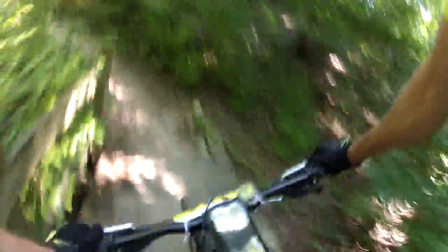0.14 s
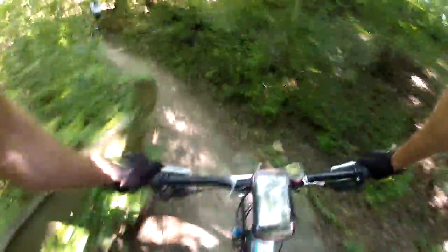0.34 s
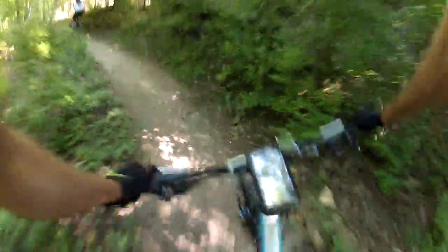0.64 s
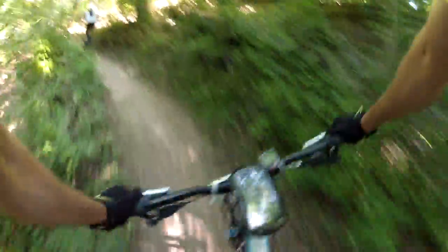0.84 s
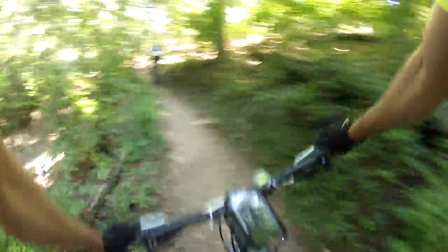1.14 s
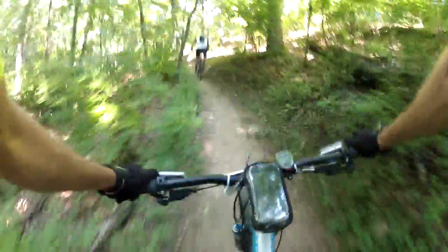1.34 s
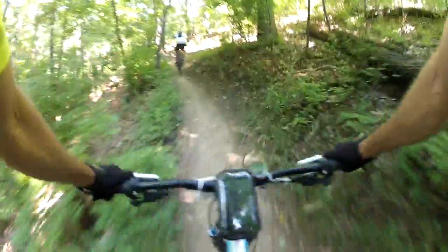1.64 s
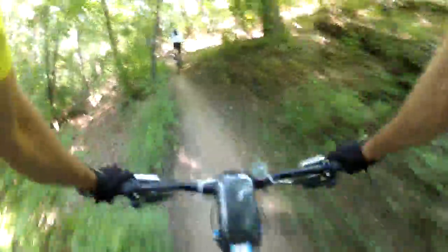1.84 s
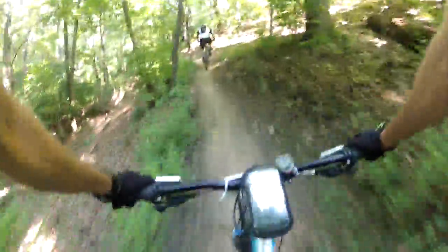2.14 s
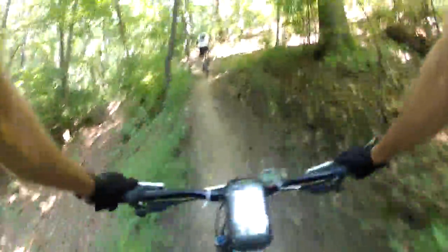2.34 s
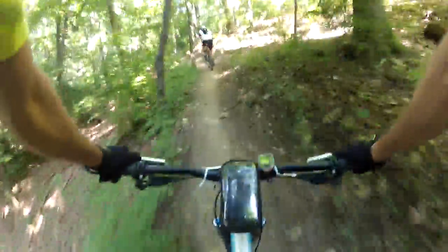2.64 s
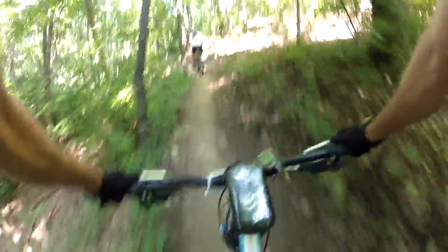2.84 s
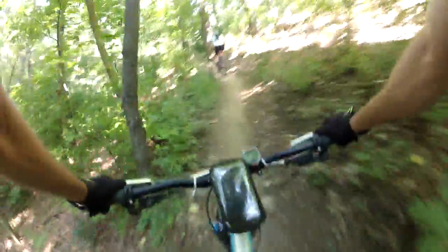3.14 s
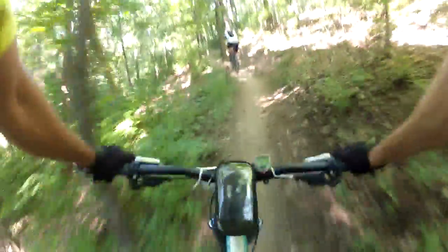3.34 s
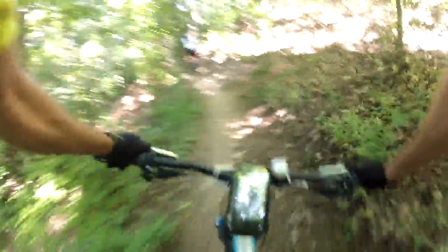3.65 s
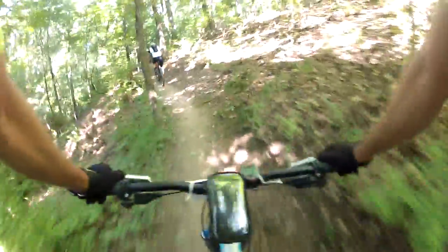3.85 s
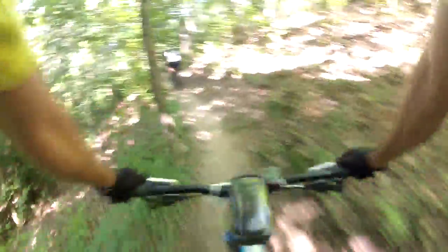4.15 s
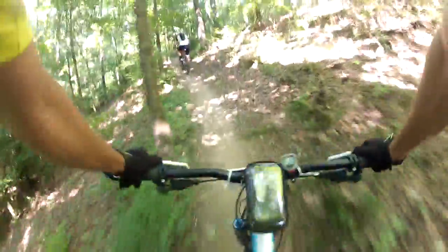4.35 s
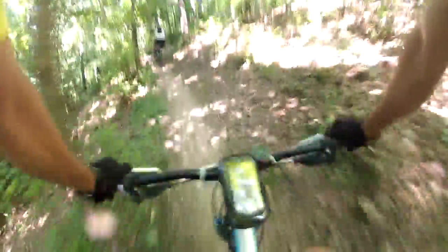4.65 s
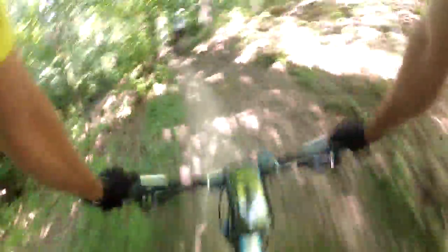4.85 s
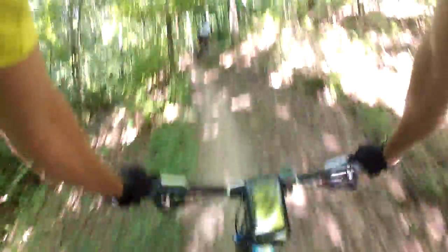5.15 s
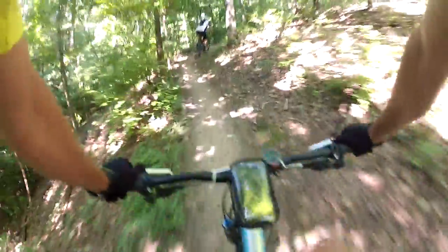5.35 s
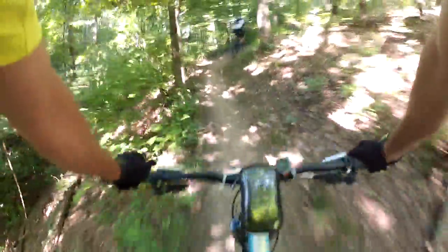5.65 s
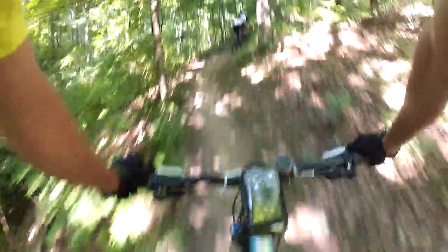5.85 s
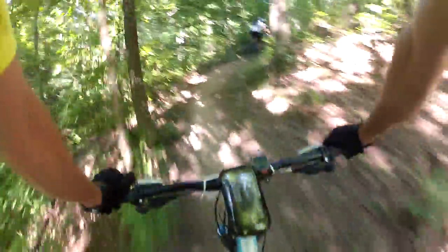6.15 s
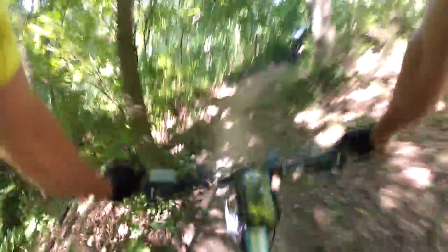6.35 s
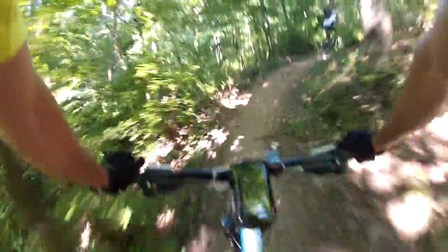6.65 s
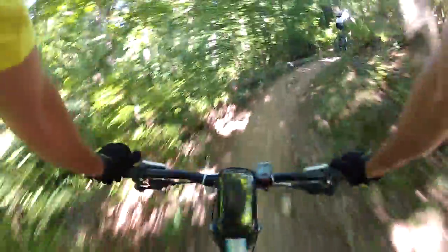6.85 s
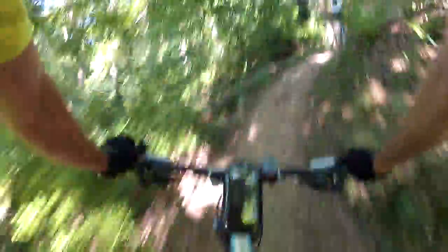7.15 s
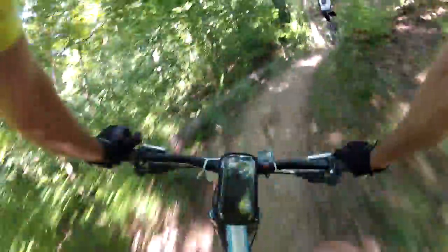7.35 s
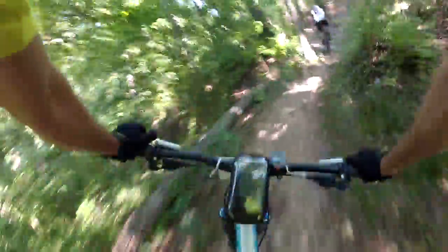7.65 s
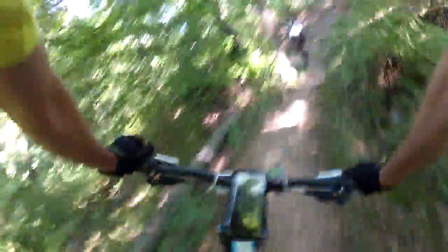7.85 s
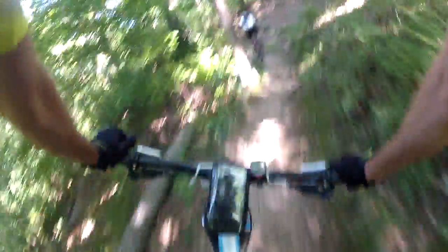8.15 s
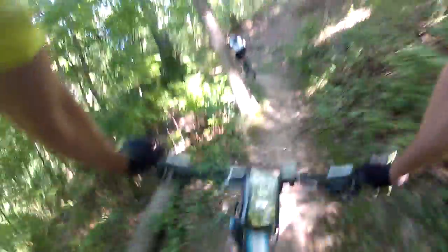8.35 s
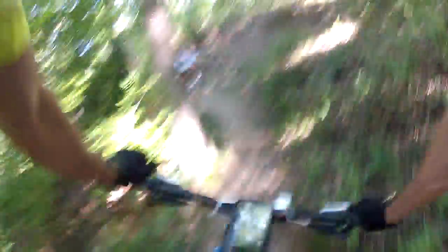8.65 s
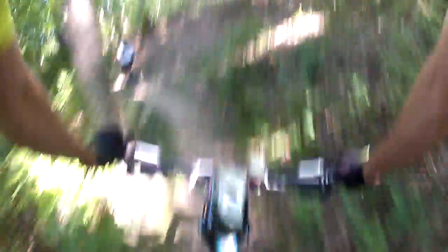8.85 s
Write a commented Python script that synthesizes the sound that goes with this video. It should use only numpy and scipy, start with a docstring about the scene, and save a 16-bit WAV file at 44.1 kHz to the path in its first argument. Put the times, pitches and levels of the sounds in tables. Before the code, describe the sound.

Heard from inside a closed plastic housing on the rider's chest, tyres rumble, strap rubs, plastic knocks and bumps thud, and a faint tone sounds.

```python
"""Low jolts and hard plastic knocks come first, over tyre rumble and a dry rubbing: a bumpy dirt trail by bike.
The microphone sits in a camera in a closed plastic housing, strapped to the rider's chest. Little comes
through the air: rumble and jolts (noise, short swings) arrive through the body; strap and knocks ring the
housing modes. A thin tone sounds three times. The sound chip samples slowly and mirrors all this in the treble."""
import sys
import numpy as np
from scipy import signal
from scipy.fft import rfft, irfft
from scipy.io import wavfile

SR = 44100
rng = np.random.default_rng(int(sys.argv[2]) if len(sys.argv) > 2 else 0)


def materialize(psi):
    """Save the field psi as 16-bit PCM at rate SR to the path in sys.argv[1].

    A 1-D psi becomes a single channel; in a 2-D psi each row is a channel.
    """
    bounded = np.clip(np.atleast_2d(psi).T, -1, 1)
    quanta = np.round(bounded * 32767).astype(np.int16)
    wavfile.write(sys.argv[1], SR, quanta)


N = 397341

# Low jolts from roots and stones, felt through the chest.
# Each row: peak time in seconds, envelope peak in dB before gain control, pitch in Hz.
JOLT_EVENTS = [(0.06, -22, 114), (0.178, -23.5, 112), (0.2402, -26, 156), (0.351, -7.5, 122),
               (0.655, -38, 136), (0.822, -35.5, 100), (0.898, -32.5, 92), (1.108, -26, 117),
               (1.152, -25, 130), (1.2554, -6, 158), (1.36, -14.5, 131), (2.067, -34.5, 111),
               (2.205, -35, 95), (2.489, -28.5, 86), (2.599, -33, 118), (3.218, -36, 99), (3.311, -32, 140),
               (3.444, -24.5, 101), (3.861, -30, 91), (4.332, -24, 90.6), (4.589, -29.5, 101),
               (4.776, -30.5, 99.5), (4.855, -27, 86), (4.933, -25, 145), (4.977, -29, 162),
               (5.044, -13, 168), (6.527, -36, 147), (6.645, -32, 103), (6.755, -39, 100),
               (6.84, -28.5, 136), (7.301, -31, 114), (7.59, -33, 102), (7.94, -29, 99), (8.003, -35, 106),
               (8.15, -37, 110), (8.336, -27.5, 142), (8.541, -31, 112), (8.675, -29, 141),
               (8.777, -29, 132), (8.9, -26.5, 154), (8.96, -32.5, 151)]
# The camera knocking in its housing, right at the microphone.
# Each row: start in seconds, peak in dB before gain control, extra level of the dull modes in dB,
# extra level of the bright modes in dB.
KNOCK_EVENTS = [(0.0218, -28.5, -1, 0), (0.0854, -31, -13, -12), (0.1138, -27, -14, -5),
                (0.2188, -14, -1, -9), (0.2355, 17, 12, -10), (0.3392, -26, 8, -9), (0.3545, -13, -2, 2),
                (0.5651, -31.5, -5, -15), (0.777, -29.5, -2, -3), (1.1074, -21.5, -1.5, -5.5),
                (1.2505, 16, -2, -28), (1.278, -27, -9, -25), (1.654, -41, -14, -20),
                (1.8244, -27.5, -7, -6), (2.068, -33.5, 0, -5), (2.2046, -23, -1, -4), (2.212, -21, -7, -6),
                (2.2207, -15.5, -11, 2), (2.257, -33, -1, -8), (2.272, -30, -2, -21),
                (3.259, -32, -9, -16.5), (3.436, -36, 16, -20), (4.1956, -32, 1, -24),
                (4.8414, -30.5, 5, -12), (4.896, -30.5, 18, -9), (4.9442, -24, -12, -8),
                (5.0411, -8.5, -13, -44), (7.1252, -21, -12, -15), (7.253, -35, 6, -11.5),
                (8.5242, -19.5, -7, -2.5), (8.668, -24, -13, -8), (8.735, -29, -8, -7),
                (8.896, -18, 2, 0.5)]
# Resonances of the plastic housing around the microphone.
# Each row: pitch in Hz, width in Hz before any contact damping, relative level in dB when rubbed,
# relative level in dB when knocked.
HOUSING_MODES = [(330, 94, -11, -7.5), (490.6, 87, -5, 7.5), (653, 190, -7.5, -7), (938, 277, -5, 17),
                 (1120, 196, -1, 1), (1363, 340, -8.5, 16.5), (1795, 191, -5, 15), (2038, 200, -4, 14),
                 (2340, 444, -10.5, -59), (2880, 360, -7.5, 14), (3415, 294, -8.5, -12.5),
                 (4166, 65, -8, 3.5), (4290, 570, -14, -26), (5400, 860, -26, -39.5), (1395, 26, -21.5, 12)]
# The strap sliding on the housing at the bigger shakes; the swells at 0.258 s and 1.264 s are instead a brief
# rattle right after the two hardest knocks. Each row: swell peak in seconds, nominal length in ms, rubbing in
# dB, bright scratch in dB before its flicker.
STRAP_SLIDES = [(0.041, 15, -38.5, -48), (0.258, 18.4, -20, -57), (0.355, 37, -29.5, -35),
                (0.683, 32, -42, -47), (0.79, 38, -42.5, -48), (0.878, 18, -43.5, -58),
                (0.971, 71, -44.5, -72), (1.112, 28, -38, -44), (1.192, 69, -44.5, -56),
                (1.264, 25, -36, -58), (1.353, 52, -37, -47), (1.562, 41, -49.5, -52.5),
                (1.744, 30, -56, -56), (1.817, 75, -51, -56.5), (1.975, 62, -51, -68),
                (2.218, 22, -43, -40), (2.272, 22, -41, -49), (2.389, 32, -53, -49.5),
                (2.509, 44, -38, -55), (2.596, 36, -44, -64), (2.764, 76, -49.5, -55.5),
                (2.883, 87, -51, -58), (2.98, 50, -67, -57.5), (3.03, 25, -45.5, -64),
                (3.128, 48, -45.5, -61.5), (3.29, 96, -47.5, -52.5), (3.403, 60, -47.5, -75),
                (3.625, 78, -45.5, -47.5), (3.709, 54, -46, -63), (3.817, 127, -51, -55.5),
                (3.954, 55, -51.5, -61), (4.217, 113, -46, -55.5), (4.359, 34, -60, -49.5),
                (4.519, 50, -47, -48.5), (4.658, 32, -44.5, -56.5), (4.77, 46, -40.5, -43),
                (4.942, 26.5, -38.5, -38.5), (5.05, 39, -35.5, -54), (5.179, 76, -40, -42.5),
                (5.289, 73, -51.5, -59.5), (5.533, 130, -53, -67), (5.911, 360, -54.5, -61.5),
                (6.199, 98, -54.5, -57), (6.352, 57, -58, -55), (6.411, 41, -49, -55),
                (6.539, 63, -45, -45), (6.643, 93, -50, -57), (6.868, 89, -49, -57),
                (7.03, 130, -54.5, -59), (7.171, 67, -47, -50), (7.256, 45, -46.5, -60),
                (7.32, 48, -41, -52.5), (7.432, 19, -58, -50), (7.612, 230, -58, -57),
                (7.734, 43, -47, -50), (7.918, 106, -45.5, -53), (8.132, 62, -49, -57),
                (8.322, 43, -42, -44), (8.405, 120, -47, -56.5), (8.536, 30, -36.5, -42),
                (8.673, 38, -36, -39.5), (8.737, 34, -45, -43.5), (8.896, 14, -41, -44),
                (8.961, 28, -41.5, -45.5)]
# How rough the trail is, as felt at the chest.
# Each row: time in seconds, rumble level in dB, steady strap drag in dB.
TRAIL_ROUGHNESS = [(0.0, -43, -49.5), (0.12, -41.5, -46.5), (0.65, -45, -50), (1.18, -42.5, -51),
                   (1.53, -48, -53.5), (1.88, -48.5, -55.5), (2.33, -43, -49), (2.63, -47.5, -53),
                   (3.71, -46.5, -55.5), (3.89, -51.5, -59.5), (4.12, -49.5, -54), (4.29, -41, -50.5),
                   (4.64, -47, -51), (4.92, -39.5, -46.5), (5.07, -45, -52.5), (5.4, -47.5, -56),
                   (6.35, -50.5, -56.5), (6.67, -47, -56), (7.33, -48, -53.5), (9.01, -40.5, -49)]
# Colour of the tyre rumble after its way through frame and body.
# Each row: frequency in Hz, relative spectrum level in dB.
RUMBLE_COLOUR = [(8.8, -21.5), (15, 6), (23, -2), (43, -6.5), (122, -4.5), (193, -10), (255, -17),
                 (322, -23.5), (500, -32), (650, -46), (1100, -120)]
# A thin steady tone. Each row: start in seconds, start of the fade in seconds, rms level in dB.
TONE_SPANS = [(0.0, 0.011, -46.5), (0.232, 0.318, -46.5), (1.254, 1.337, -44)]

JOLT_RISE_CYCLES, JOLT_FALL_CYCLES = 0.28, 0.98   # to 1/e of the envelope peak
DULL_TOP_HZ, BRIGHT_FROM_HZ = 1600, 2600
BUZZ_HZ = 1990   # the wall slaps back at the camera this often while they touch
CONTACT_MS = 2.8   # how long camera and wall touch
PRESS_MS = 1.35   # contact pressure builds at 1 per this time, from 0.36 up to 1
SCRATCH_DB = -11   # the bright part of the steady drag, relative to its rubbing
MODE_FLICKER_DB, MODE_FLICKER_HZ = 1.6, 14.3   # the drag favours now one mode, now another
TONE_HZ, TONE_FADE_S = 700, 0.041
SAMPLING_HZ = 12000
STOPBAND_HZ = 16328   # the output is 80 dB down from here


def from_db(db):
    """Decibels to gain."""
    return 10 ** (np.asarray(db) / 20)


def rms_one(x):
    """Scale to rms 1."""
    return x / np.sqrt(np.mean(x ** 2) + 1e-20)


def drift(corner_hz):
    """Slow chance of spread 1: noise through a double one-pole low-pass."""
    r = np.exp(-2 * np.pi * corner_hz / SR)
    noise = rng.standard_normal(N + SR)
    settled = signal.lfilter([1], [1, -2 * r, r * r], noise)[SR:]
    return rms_one(settled)


def resonance(x, hz, width_hz):
    """Two-pole band-pass, gain 1 on top."""
    r = np.exp(-np.pi * width_hz / SR)
    zeros = (1 - r * r) / 2 * np.array([1, 0, -1])
    poles = [1, -2 * r * np.cos(2 * np.pi * hz / SR), r * r]
    return signal.lfilter(zeros, poles, x)


def add(out, start_s, sound):
    """Mix a short sound in at start_s seconds, cut off at the ends of the scene."""
    i = round(start_s * SR)
    out[max(i, 0):i + len(sound)] += sound[max(-i, 0):N - i]


def jolts():
    """Each jolt is a cycle or two of the chest and mount swinging: a quick rise, a slower fall."""
    out = np.zeros(N)
    t = np.arange(-SR // 40, SR // 10) / SR
    cycles = np.where(t < 0, JOLT_RISE_CYCLES, JOLT_FALL_CYCLES)
    phases = rng.uniform(0, 2 * np.pi, (len(JOLT_EVENTS), 1))
    for (peak_s, peak_db, hz), phase in zip(JOLT_EVENTS, phases):
        envelope = np.exp(-(hz * t / cycles) ** 2)
        swing = np.sin(2 * np.pi * hz * t + phase)
        add(out, peak_s + t[0], from_db(peak_db) * envelope * swing)
    return out


def knocks():
    """A knock is a brief buzz of contacts and a faint after-rattle; it strikes every mode with its own strength."""
    out = np.zeros(N)
    t = np.arange(SR // 16) / SR
    ms = 1000 * t
    touching = np.clip(np.minimum(CONTACT_MS - ms, 0.36 + ms / PRESS_MS), 0, 1)
    slap_times = np.diff(np.floor(BUZZ_HZ * t), prepend=-1)
    soften = signal.butter(4, BRIGHT_FROM_HZ, fs=SR, output="sos")
    mode_chance = rng.standard_normal((len(KNOCK_EVENTS), len(HOUSING_MODES)))
    for (start_s, peak_db, dull_db, bright_db), strengths in zip(KNOCK_EVENTS, mode_chance):
        grit = rng.standard_normal(len(t))
        slaps = slap_times * touching * (1 + 0.1 * grit)
        rattle = from_db(-26.5) * np.exp(-t / 0.0043) * grit
        blunt = signal.sosfilt(soften, slaps + 0.2 * touching * grit + rattle)   # what the low modes feel
        sharp = 0.51 * touching * grit + slaps
        sound = 0
        for (hz, width_hz, _, knocked_db), strength in zip(HOUSING_MODES, strengths):
            group_db = dull_db if hz < DULL_TOP_HZ else bright_db if hz > BRIGHT_FROM_HZ else 0
            blow = sharp if hz > BRIGHT_FROM_HZ else blunt
            # the touching camera damps the high modes most
            damped_hz = width_hz * (1.1 + (hz / 6500.0) ** 2)
            mode_gain = from_db(knocked_db + group_db + 0.7 * strength)
            sound = sound + mode_gain * resonance(blow, hz, damped_hz)
        add(out, start_s, from_db(peak_db) * sound / np.abs(sound).max())
    return out


def strap(rub_db, scratch_db, slips_per_s, spread_db, patchy_db):
    """Webbing drags on plastic: smooth friction plus small uneven slips, heard through the housing modes."""
    slip_db = spread_db * np.minimum(rng.exponential(1, N), 4)
    slip_sizes = from_db(slip_db) * rng.choice([-1, 1], N)
    slip_chance = slips_per_s * from_db(5 * drift(15)) / SR   # slips come now denser, now sparser
    slips = rms_one(slip_sizes * (rng.random(N) < slip_chance))
    friction = (0.43 * slips + rng.standard_normal(N)) * from_db(patchy_db * drift(33))
    rub, scratch = 0, 0
    for k, (hz, width_hz, rubbed_db, _) in enumerate(HOUSING_MODES):
        flicker_db = MODE_FLICKER_DB * drift(MODE_FLICKER_HZ)
        sign = (-1) ** k   # neighbours in the table ring in opposite sense
        mode = sign * from_db(rubbed_db + flicker_db) * resonance(friction, hz, width_hz)
        if hz < BRIGHT_FROM_HZ:
            rub = rub + mode
        else:
            scratch = scratch + mode
    rub_slide, scratch_slide = slides()
    rub_gain = np.hypot(from_db(rub_db), rub_slide)   # steady drag and slides add in power
    scratch_gain = np.hypot(from_db(scratch_db), scratch_slide)
    scratch_gain = scratch_gain * from_db(patchy_db * drift(30))   # the bright part flickers on its own
    return rub_gain * rms_one(rub) + scratch_gain * rms_one(scratch)


def slides():
    """Gain of rubbing and of scratch in time: one swell per row (mostly strap slides), rising faster than it
    falls."""
    out = np.zeros((2, N))
    t = np.arange(-SR // 8, SR // 6) / SR
    side = np.where(t < 0, .4, .55)   # share of the length on either side of the peak, to 1/e
    for peak_s, length_ms, rub_db, scratch_db in STRAP_SLIDES:
        swell = np.exp(-np.abs(1000 * t / (length_ms * side)) ** 1.6)
        add(out[0], peak_s + t[0], from_db(rub_db) * swell)
        add(out[1], peak_s + t[0], from_db(scratch_db) * swell)
    return out


def rumble(level_db, lumpy_db):
    """Tyres on dirt, felt through frame and body: lumpy low noise."""
    hz = np.maximum(np.arange(N // 2 + 1) * SR / N, 1)
    colour_hz, colour_db = np.transpose(RUMBLE_COLOUR)
    colour = from_db(np.interp(np.log(hz), np.log(colour_hz), colour_db))
    noise = irfft(rfft(rng.standard_normal(N)) * colour, N)
    lumpy = noise * from_db(lumpy_db * drift(12))
    return from_db(level_db) * rms_one(lumpy)


def tone():
    """A thin sine that starts at once, holds its level, then fades quickly."""
    t = np.arange(N) / SR
    level = np.zeros(N)
    for start_s, fade_s, rms_db in TONE_SPANS:
        fade = np.exp(-np.maximum(t - fade_s, 0) / TONE_FADE_S)
        level += from_db(rms_db) * (t >= start_s) * fade
    return np.sqrt(2) * level * np.sin(2 * np.pi * TONE_HZ * t)


def scene():
    """Body-borne and housing sounds add up at the single microphone inside the housing."""
    row_s, *columns = np.transpose(TRAIL_ROUGHNESS)
    t = np.arange(N) / SR
    rumble_db, rub_db = [np.interp(t, row_s, column) for column in columns]
    body = jolts() + rumble(rumble_db, lumpy_db=3.0)
    drag = strap(rub_db, rub_db + SCRATCH_DB, slips_per_s=270.0, spread_db=5.0, patchy_db=2.0)
    housing = knocks() + drag
    return (body + housing)[None]


def gain_control(x, threshold_db, share, attack_s, release_db_per_s):
    """Loud peaks pull the gain down within milliseconds; it creeps back at a steady rate."""
    over_db = np.maximum(20 * np.log10(np.abs(x) + 1e-9) - threshold_db, 0)
    # a running maximum on a rising ramp makes each peak fall back at the release rate
    ramp = release_db_per_s * np.arange(N) / SR
    held_db = np.maximum.accumulate(over_db + ramp, axis=1) - ramp
    r = np.exp(-1 / (attack_s * SR))
    smooth_db = signal.lfilter([(1 - r) ** 2], [1, -2 * r, r * r], held_db)
    return x * from_db(-share * smooth_db)


def record(dry):
    """Gain control, overload, then slow samples each held until the next: mirror images around the sampling rate."""
    x = gain_control(dry, threshold_db=-10.5, share=0.64, attack_s=0.0034, release_db_per_s=223.5)
    x = x + tone()
    x = .84 * np.tanh(x / .84)   # soft overload
    x = signal.sosfilt(signal.butter(6, SAMPLING_HZ * 0.46, fs=SR, output="sos"), x)
    mirrored = x * (1 + 2 * np.cos(2 * np.pi * SAMPLING_HZ * np.arange(N) / SR))
    hz = np.arange(N // 2 + 1) * SR / N
    held = irfft(rfft(mirrored) * np.sinc(hz / SAMPLING_HZ), N)   # holding dulls the treble
    return signal.sosfilt(signal.cheby2(14, 80, STOPBAND_HZ, fs=SR, output="sos"), held)


dry = scene()
out = record(dry)
materialize(out)
```